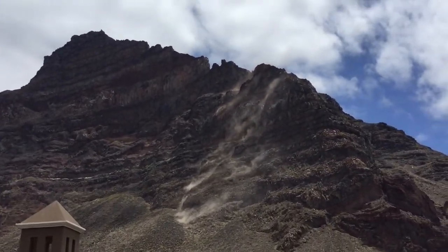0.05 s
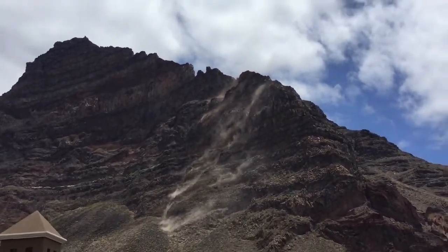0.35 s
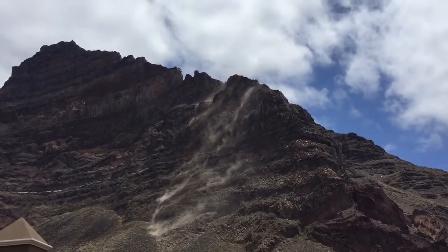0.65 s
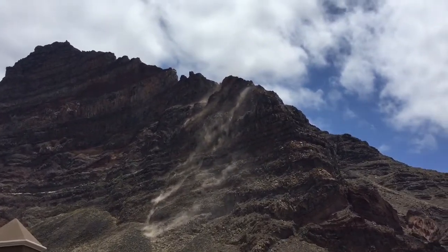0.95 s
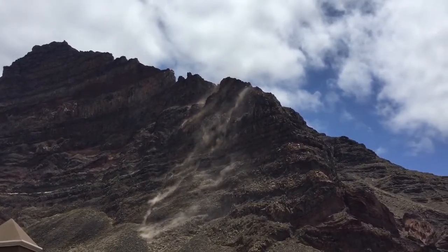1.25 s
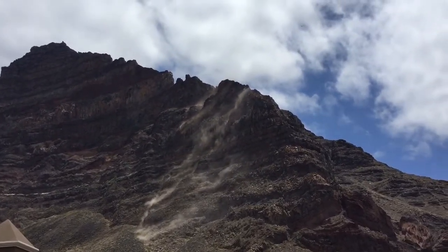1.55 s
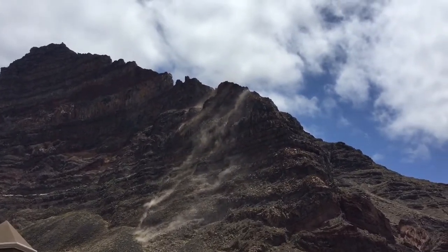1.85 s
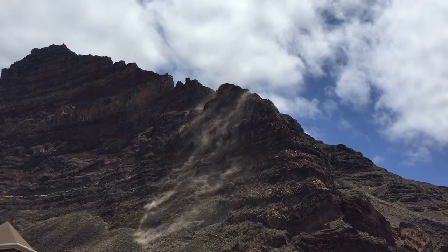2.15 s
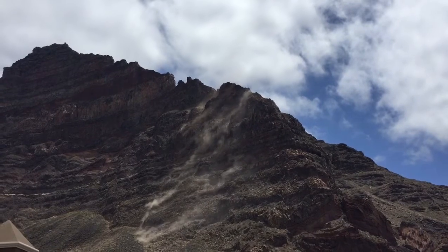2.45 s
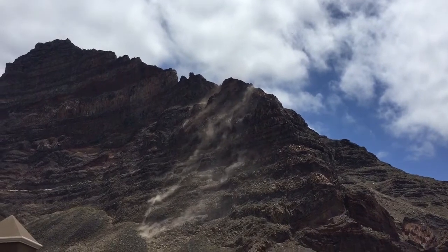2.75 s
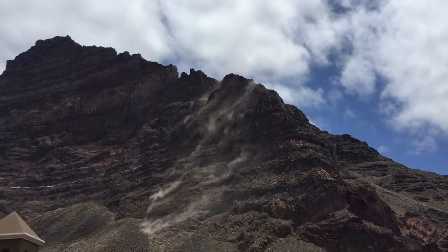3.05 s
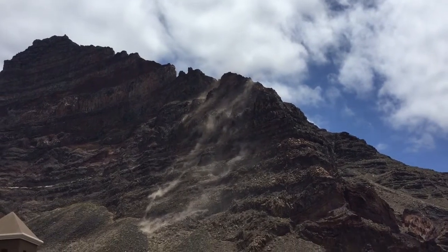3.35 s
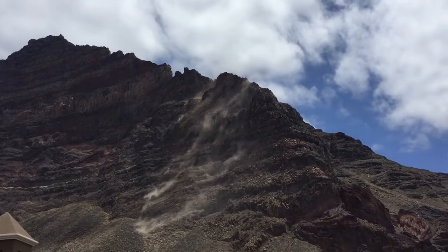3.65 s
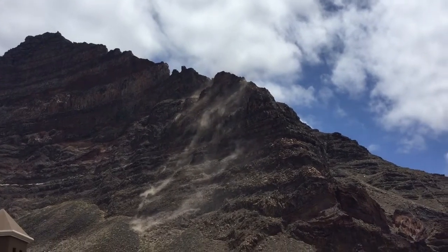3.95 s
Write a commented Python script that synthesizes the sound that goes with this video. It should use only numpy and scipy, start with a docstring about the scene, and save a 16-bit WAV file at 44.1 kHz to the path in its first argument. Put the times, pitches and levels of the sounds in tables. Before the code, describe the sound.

Low wind gusts thump on a close microphone outdoors, strongest at the start, then dropping to an uneven breeze with brief surges. Behind it, debris and pebbles slide faintly down a distant cliff, and a few stones knock later on.

```python
"""Gusts below a rockfall.

Wind buffets a microphone at the foot of a cliff where a rockfall is running out.
Each gust rumbles, brightens as it grows, and thumps or tears as eddies cross the port.
Far off lie the wash of open air and sliding debris, trickling pebbles and a few stone knocks;
close by, one brief rustle."""
import sys
import numpy as np
from scipy import signal
from scipy.fft import rfft, irfft
from scipy.io import wavfile
from scipy.ndimage import uniform_filter1d

SR = 44100
rng = np.random.default_rng(int(sys.argv[2]) if len(sys.argv) > 2 else 0)


def waveform_to_disk(signal):
    """Save audio, clipped to [-1, 1], as 16-bit WAV at the path in sys.argv[1]."""
    frames = np.transpose(np.atleast_2d(signal))
    scaled = np.clip(frames, -1, 1) * 32767
    samples = np.round(scaled).astype(np.int16)
    wavfile.write(sys.argv[1], SR, samples)


N = 176400
T = np.arange(N) / SR
HZ = np.fft.rfftfreq(N, 1 / SR)


def amp(db):
    """Decibels to gain."""
    return 10 ** (np.asarray(db) / 20)


def unit_rms(x):
    """Scales to an rms of one."""
    return x / np.sqrt(np.mean(x ** 2) + 1e-20)


def curve_at(points, hz):
    """Reads a spectrum on a log-frequency axis."""
    f, value = np.transpose(points)
    return np.interp(np.log(hz + 1), np.log(f + 1), value)


def noise(gain):
    """Noise of unit rms, shaped by a gain at each frequency."""
    return unit_rms(irfft(rfft(rng.standard_normal(N)) * gain, N))


def bell(s, half_s):
    """A smooth rise and fall around a moment."""
    return np.exp(-.5 * ((T - s) / half_s) ** 2)


# Strong opening gusts, right on the microphone (time [s], wind level [dB])
GUSTS = [(0.0, -49.5), (0.025, -21.5), (0.14, -33.5), (0.16, -39), (0.2, -42), (0.23, -30.5), (0.28, -18.5),
         (0.42, -36), (0.44, -27.5), (0.56, -31.5), (0.58, -31.0), (0.605, -28), (0.63, -37), (0.72, -38.5),
         (0.735, -49), (0.77, -38), (0.83, -72)]
# The lighter breeze that follows at the foot of the cliff (time [s], wind level [dB])
BREEZE = [(0.86, -72), (0.895, -46), (0.93, -48), (1.04, -57.7), (1.255, -46.5), (1.335, -49.5),
          (1.445, -43), (1.495, -59), (1.6, -48.5), (1.63, -52.5), (1.76, -44.5), (1.8, -63), (1.85, -47.5),
          (1.96, -60.5), (2.04, -52.8), (2.1, -39.5), (2.21, -41), (2.295, -50), (2.32, -62), (2.4, -62),
          (2.44, -49), (2.525, -45.5), (2.57, -55.6), (2.615, -53), (2.705, -82), (2.75, -52),
          (2.865, -52.5), (2.9, -47.5), (2.965, -46.5), (3.035, -26.5), (3.08, -33), (3.14, -54),
          (3.18, -47.2), (3.32, -59), (3.345, -63), (3.525, -57.5), (3.675, -49.5), (3.745, -48.5),
          (3.77, -57), (3.855, -49.1), (3.89, -34), (3.915, -43.5), (3.955, -61), (4.0, -58.8)]
# Turbulence at the microphone port, at the reference wind level (frequency [Hz], relative level [dB])
TURBULENCE = [(20, -40.5), (32, -15.5), (46, -0.5), (66, 4), (90, 0.5), (125, -2.5), (200, -9.5),
              (320, -17), (500, -28), (900, -39), (2000, -81.5), (5000, -110)]


def wind(reference_db=-27, growth=.62, flutter_db=2.48, flutter_hz=21.6, brighten=.17, pivot_hz=110):
    """Lumpy low turbulence that brightens with the wind; strong gusts grow less as eddies take over."""
    level_db = np.interp(T, *np.transpose(list(GUSTS) + list(BREEZE)))
    level_db -= (1 - growth) * np.maximum(level_db - reference_db, 0)
    level_db += flutter_db * noise(np.exp(-(HZ / flutter_hz) ** 2) * HZ)
    tilt_db_per_octave = brighten * (level_db - reference_db)
    flow = noise(amp(curve_at(TURBULENCE, HZ)))
    power = uniform_filter1d(uniform_filter1d(flow ** 2, size=1000), size=1000)
    steady_spectrum = rfft(flow / np.sqrt(power + 1e-6))
    centres = np.geomspace(25, 3200, 8)
    out = np.zeros(N)
    for hz, weights in zip(centres, np.eye(len(centres))):
        band = irfft(steady_spectrum * curve_at(np.c_[centres, weights], HZ), N)
        octaves_up = max(np.log2(hz / pivot_hz), 0)
        out += band * amp(level_db + tilt_db_per_octave * octaves_up)
    return amp(-1) * out


# Single eddies thumping the microphone port
# (time [s], relative level [dB], pitch [Hz], half length [cycles])
EDDIES = [(0.026, -17, 100, 0.45), (0.042, -11.5, 126, 0.22), (.053, -12.5, 254, 0.25),
          (.077, -22, 141, 0.25), (.106, -33, 171, 1), (.130, -17.5, 96.7, 0.36), (.279, -11, 140, 0.46),
          (.303, -6, 260, 0.37), (0.322, -24.5, 140, 0.65), (.446, -17, 220, 0.72), (.488, -18, 307, 0.29),
          (0.504, -19.5, 200, 0.83), (0.52, -17.5, 189, .7), (.542, -12.5, 299, 0.26),
          (.559, -13, 223, 0.54), (.599, -12.5, 148, 0.34), (.643, -26, 350, 0.5), (.910, -39.5, 84, 1),
          (1.451, -39, 122, 1.), (1.761, -34, 66, 0.58), (2.104, -35, 91, 0.52), (2.136, -27.5, 228, 0.32),
          (2.153, -28.5, 198, 0.48), (2.175, -33, 196, 0.61), (2.483, -31.5, 400, 0.43),
          (3.039, -20.5, 220, 0.75), (3.059, -25.5, 167, 0.62), (3.074, -26, 74.5, 0.57),
          (3.903, -21.5, 207, 0.52)]


def eddies():
    """Each eddy is a quick swing of suction and pressure."""
    out = np.zeros(N)
    for s, db, hz, cycles in EDDIES:
        out += amp(db) * bell(s, cycles / hz) * np.sin(2 * np.pi * hz * (T - s))
    return amp(-3.5) * out


# The flow tearing across the microphone (time [s], half length [s], level [dB], corner [Hz])
TEARS = [(0.031, 0.0059, -50, 520), (0.057, 0.0034, -33, 795), (.075, 0.0031, -35, 1230),
         (0.27, 0.0062, -31, 590), (0.283, 0.0018, -22, 666), (0.297, 0.013, -28.5, 717),
         (0.449, 0.0054, -40.5, 494), (0.488, 0.0018, -38.5, 540), (0.544, 0.0056, -40.5, 575),
         (0.647, 0.0015, -49, 615), (2.482, 0.0046, -56, 1930), (3.036, 0.0017, -36.5, 520),
         (3.905, 0.0033, -39, 407)]


def tears(low_hz=340, slope=4.12, top_ratio=2.56):
    """Short, brighter bursts of turbulence at the crests of the gusts."""
    bass_cut = HZ ** 2 / (HZ ** 2 + low_hz ** 2)
    out = np.zeros(N)
    for s, half, db, corner in TEARS:
        treble_cut = np.exp(-(HZ / (top_ratio * corner)) ** 2) / (1 + (HZ / corner) ** slope)
        out += amp(db) * bell(s, half) * noise(bass_cut * treble_cut)
    return out


# Stones striking the slope, far from the microphone (time [s], level [dB], ring [s], pitch [ratio])
KNOCKS = [(2.660, -54.5, 0.0092, 2.34), (3.09, -50, 0.041, 1.03), (3.173, -40.5, 0.024, 0.93),
          (3.314, -60, 0.018, 2), (3.378, -51.5, 0.017, 1.13), (3.431, -59.5, 0.031, 1.44)]
# One knock as heard from below the cliff (frequency [Hz], relative level [dB])
STONE_COLOUR = [(200, -7.5), (500, -11.5), (620, -12.5), (720, -2.5), (850, -2), (1100, -13.5),
                (1450, -26.5), (1850, -15.5), (2200, -19), (2800, -26.5), (3500, -35), (7000, -47),
                (14000, -54)]


def stones(rise_s=.0037):
    """A few hollow knocks, blurred by distance; smaller stones sound higher."""
    out = np.zeros(N)
    for s, db, ring, pitch in KNOCKS:
        age = np.maximum(T - s, 0)
        envelope = np.minimum(age / rise_s, 1) * np.exp(-age / ring)
        out += amp(db) * envelope * noise(amp(curve_at(STONE_COLOUR, HZ / pitch)))
    return out


# Open air and debris sliding on the distant slope (frequency [Hz], relative level [dB])
WASH = [(25, -26), (70, -17), (170, -1), (300, -5), (500, -13.5), (800, -12.5), (1200, -14.5), (2100, -17),
        (3000, -24.5), (4200, -29), (4850, -34), (5400, -32.5), (6600, -34.5), (7600, -39), (9400, -38.5),
        (10400, -44), (11300, -41), (15500, -45)]


def wash(level_db=-57.5, patch_db=3, patch_top_hz=3000):
    """A far rush of air and debris, with drifting patches in its body and an even hiss above."""
    frames, hz = N // 256 + 5, np.fft.rfftfreq(1024, 1 / SR)
    real, imag, patches = rng.standard_normal((3, frames, len(hz)))
    patches = uniform_filter1d(patches, size=10, axis=0)  # smooth in time
    patches = unit_rms(uniform_filter1d(patches, size=5, axis=1))  # and in frequency
    drift_db = patch_db * patches / np.sqrt(1 + (hz / patch_top_hz) ** 2)
    spectra = (real + 1j * imag) * amp(curve_at(WASH, hz) + drift_db)
    _, rush = signal.istft(spectra.T, nperseg=1024, noverlap=768)
    return amp(level_db) * unit_rms(rush[:N])


# A faint brush and its tick, close to the microphone (time [s], half length [s], level [dB])
RUSTLE = [(3.092, .024, -66.5), (3.080, .0014, -61.5)]
# Its thin treble at close range (frequency [Hz], relative level [dB])
RUSTLE_COLOUR = [(1500, -7), (3500, 6), (5000, -11), (6500, 0), (8000, -10), (9300, -2), (11000, -16),
                 (15500, -15)]


def rustle():
    """A thin, close brush with a tick in it."""
    envelope = sum(amp(db) * bell(s, half) for s, half, db in RUSTLE)
    return envelope * noise(amp(curve_at(RUSTLE_COLOUR, HZ)))


def pebbles(level_db=-69, per_s=150, sizes=20, ring_cycles=11, spread_db=3, db_per_octave=-4):
    """Pebbles trickle far away: faint, soft-edged pings, each size with its own pitch."""
    t, out = T[:SR // 8], np.zeros(N)
    for hz in np.geomspace(450.5, 2294, sizes):
        age = t * hz / ring_cycles
        ping = age * np.exp(-2 * age) * np.sin(2 * np.pi * hz * rng.uniform(.95, 1.05) * t)
        strength = amp(spread_db * np.minimum(rng.exponential(1, N), np.pi))
        hits = strength * (rng.random(N) < per_s / sizes / SR)
        out += amp(db_per_octave * np.log2(hz)) * signal.oaconvolve(hits, ping)[:N]
    return amp(level_db) * unit_rms(out)


def scene():
    """Wind on one microphone in front of the distant slope."""
    return (wind() + eddies() + tears() + wash() + stones() + pebbles() + rustle())[None]


def record(dry):
    """The microphone's bass cut and band limit."""
    bass_cut = signal.butter(4, 32, "high", fs=SR, output="sos")
    band_limit = signal.firwin(1023, 15650, window=("kaiser", 9), fs=SR)
    return signal.oaconvolve(signal.sosfilt(bass_cut, dry), band_limit[None], "same")


dry = scene()
out = record(dry)
waveform_to_disk(out)
```